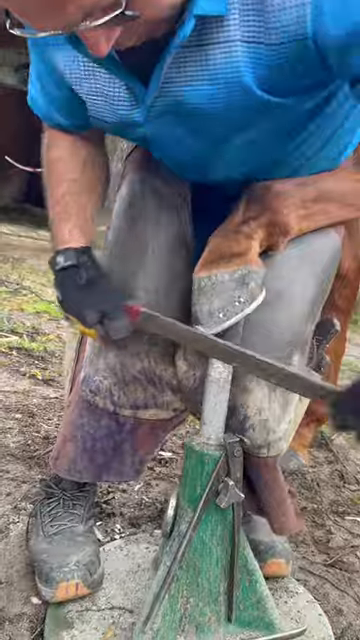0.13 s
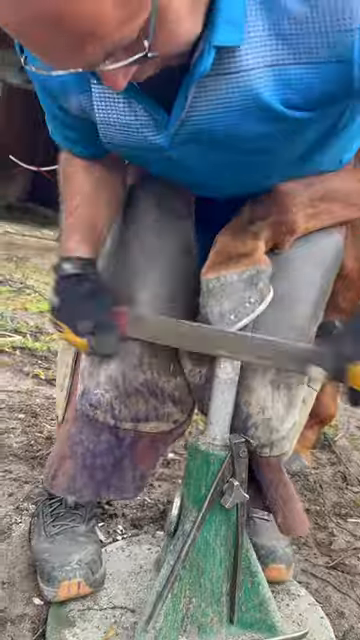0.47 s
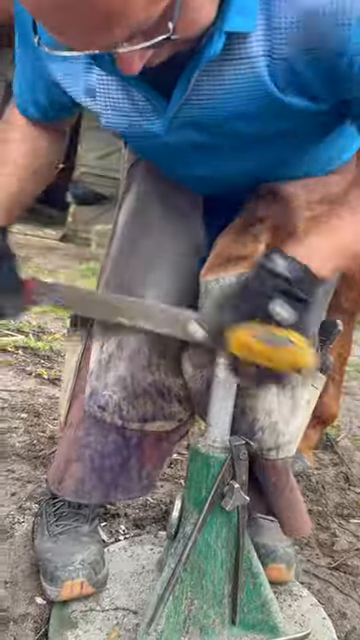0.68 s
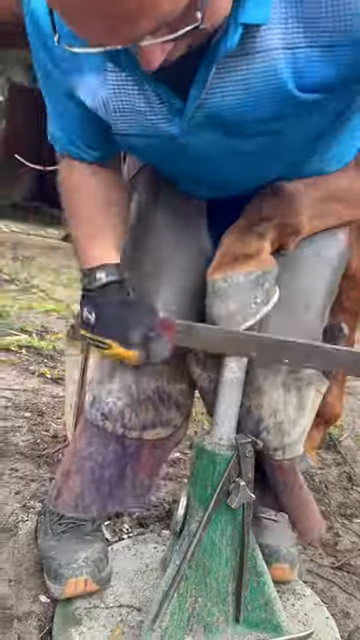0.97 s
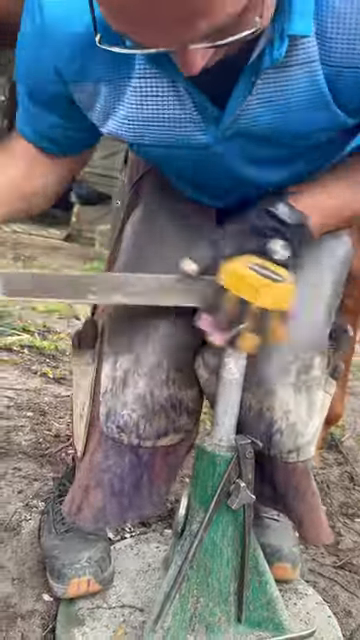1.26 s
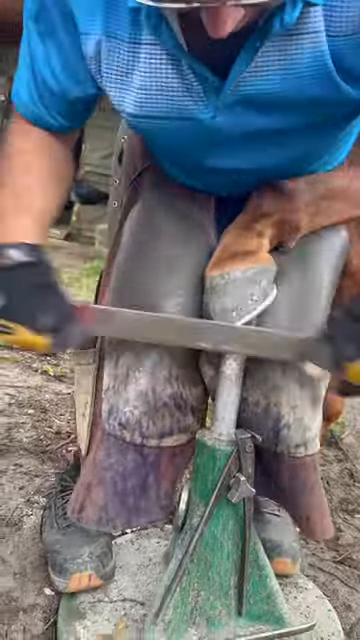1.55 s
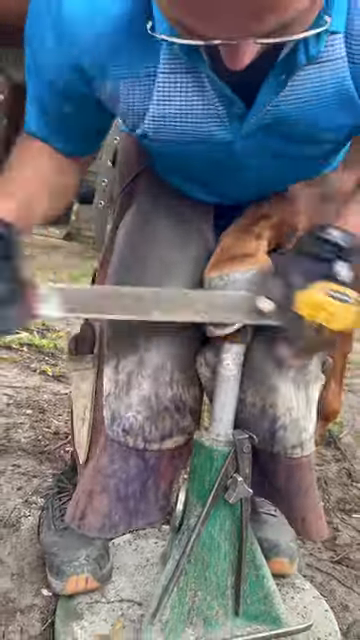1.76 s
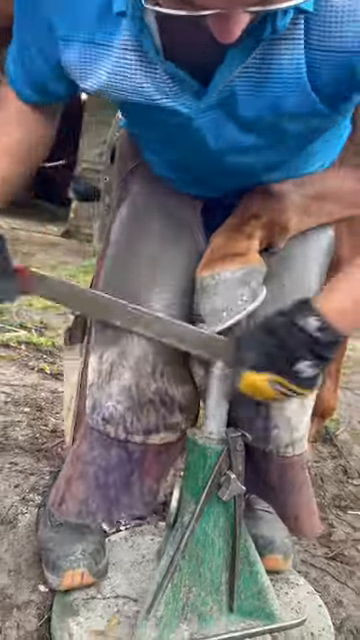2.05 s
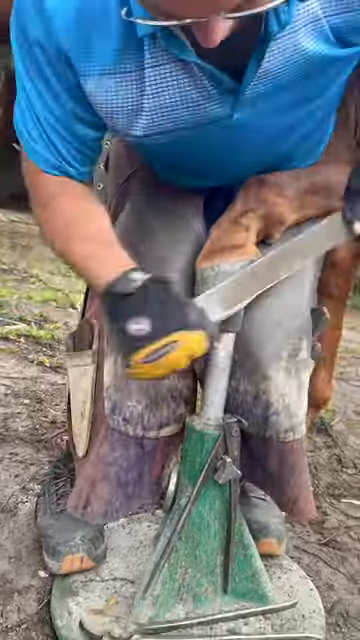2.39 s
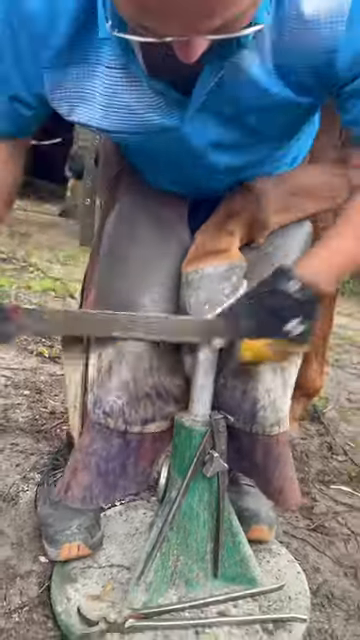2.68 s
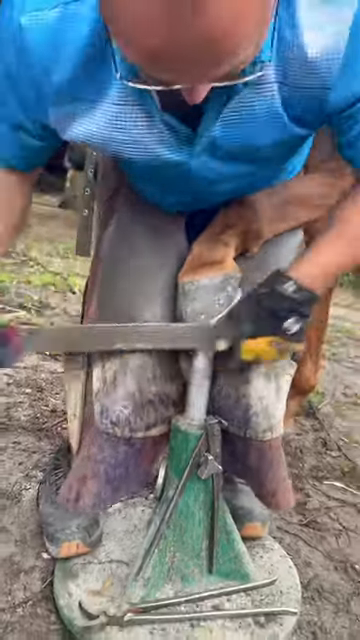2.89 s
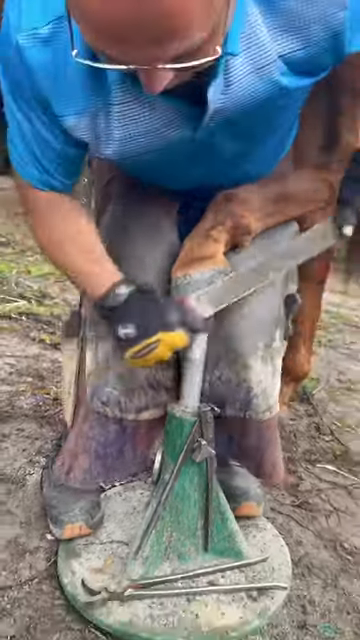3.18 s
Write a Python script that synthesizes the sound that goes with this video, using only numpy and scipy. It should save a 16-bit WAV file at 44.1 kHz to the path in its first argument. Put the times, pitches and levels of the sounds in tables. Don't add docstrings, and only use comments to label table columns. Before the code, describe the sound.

A metal rasp files a horse's hoof on a stand, coarse crackling forward strokes alternating with short bright back skids, first brisk, then slower and duller; close phone microphone outdoors, quiet yard rumble beneath.

```python
import sys
import numpy as np
from scipy import signal
from scipy.fft import rfft, irfft, next_fast_len
from scipy.io import wavfile
from scipy.ndimage import uniform_filter1d

SR = 44100
rng = np.random.default_rng(int(sys.argv[2]) if len(sys.argv) > 2 else 0)


def boost(x):
    u = np.asarray(x, float) / 20
    return 10 ** u


def dump_mix(stems):
    frames = np.atleast_2d(stems).T
    limited = np.clip(frames, -1, 1)
    pcm = np.round(limited * 32767).astype(np.int16)
    wavfile.write(sys.argv[1], SR, pcm)


N = 146853


def evened(x):
    return x / np.sqrt(np.mean(x ** 2) + 1e-20)


def read(points, hz):
    f, value = np.transpose(points)
    return np.interp(np.log(hz + 1), np.log(f + 1), value)


def colour(x, gain):
    size = next_fast_len(N + 4096)
    spectrum = rfft(x, size) * gain(np.fft.rfftfreq(size, 1 / SR))
    return irfft(spectrum, size)[..., :N]


def resonate(x, hz, width):
    turn = np.exp(2j * np.pi * np.cumsum(hz * np.ones(len(x))) / SR)
    r = np.exp(-np.pi * width / SR)
    return 2 * (turn * signal.lfilter([1 - r], [1, -r], x / turn + 1e-18)).real


def wander(span_s):
    size = max(round(span_s * SR), 2)
    smooth = uniform_filter1d(rng.standard_normal(N), size)
    return evened(uniform_filter1d(smooth, size))


def shape(start, length, rise, stop):
    t = np.arange(N) / SR - start
    env = np.clip(t / rise, 0, 1) * np.exp(-np.maximum(t - length, 0) / stop)
    return env, np.clip(t / length, 0, 1)


def chips():
    ticks_per_s, spread_db, lump_db = 16000, 1.1, 1.3
    ticks = (rng.random(N) < ticks_per_s / SR) * rng.standard_normal(N)
    size_db = spread_db * np.minimum(rng.exponential(1, N), 4)
    return evened(ticks * boost(size_db + lump_db * wander(0.002)))


def patchy(x, tilt_db):
    patch_db = 3.4
    hz, t, z = signal.stft(x, SR, nperseg=256, noverlap=192)
    blobs = uniform_filter1d(rng.standard_normal(z.shape), size=2, axis=0)
    blobs = evened(uniform_filter1d(blobs, size=14, axis=1))
    octaves = np.log2(np.clip(hz, 300, 9000) / 3000)[:, None]
    tilt = np.interp(t, np.arange(N) / SR, tilt_db) * octaves
    return signal.istft(z * boost(patch_db * blobs + tilt), SR, nperseg=256, noverlap=192)[1][:N]


# (frequency [Hz], width [Hz], level [dB])
BAR_MODES = [(1000, 38, -6), (1296, 90, 0), (1697, 310, -4), (2260, 81, -8), (2887, 180, -10),
             (3570, 54, -8), (4140, 186, -8.5), (4770, 110, -14), (5936, 81, 4), (6340, 230, 1),
             (6980, 480, 2), (7970, 20, 5.5)]
# (frequency [Hz], width [Hz], level [dB])
TOP_MODES = [(13030, 60, 0), (13840, 60, 1)]


def bar(force, tone, tilt_db):
    ring_db, waver_db = 6, 4
    sound = force.copy()
    for hz, width, db in BAR_MODES + TOP_MODES:
        drive = force * boost(waver_db * wander(0.0092))
        sound += boost(db + ring_db) * resonate(drive, hz, width)
    return colour(patchy(sound, tilt_db), lambda hz: boost(read(tone, hz)))


# (time [s], pressure [dB], tilt [dB per octave])
BRISK_PUSHES = [
    [(0.0, -26.5, -1.5), (0.025, -37.5, -5), (0.052, -49.5, 1), (0.088, -44.5, 0.2), (0.11, -64, 4)],
    [(.32, -43.5, 0.5), (.332, -34.5, 5), (.4, -28.5, 0.5), (.43, -24, -1.5), (.465, -32, -3.5),
     (.51, -48, -5.5), (.542, -38, -2), (.576, -45.5, -5)],
    [(.77, -47, 1.5), (.784, -35.5, 5), (.79, -29.5, 2), (.832, -21.5, -1.2), (.862, -29, 0.5),
     (.886, -24.5, -3.5), (.93, -40.5, 0), (.96, -58.5, 0)],
    [(1.22, -55, -2), (1.235, -35, 1.5), (1.266, -30, 4), (1.294, -31.5, 2.7), (1.328, -23.5, -3),
     (1.37, -35, -3.5), (1.41, -57, -0.5)],
]
# (time [s], pressure [dB], tilt [dB per octave])
SLOW_PUSHES = [
    [(2.14, -62.5, 2.5), (2.158, -36.5, -4.5), (2.29, -31, -2.5), (2.34, -32.5, -2), (2.38, -35, -2),
     (2.395, -43.5, -2.5), (2.43, -62, 0)],
    [(2.77, -65, -1.5), (2.781, -39.5, -6.5), (2.858, -39.5, -3.5), (2.885, -34.5, -3.5),
     (3.04, -37.5, -1.5), (3.08, -61, -5)],
]
# (time [s], pressure [dB], tilt [dB per octave])
BROKEN_PUSHES = [
    [(1.672, -56, 4), (1.688, -30, -2), (1.725, -22, 0.5), (1.742, -33.5, -4.5), (1.748, -26, 12),
     (1.765, -26.5, -3.5), (1.82, -35.5, -3.5), (1.85, -47.5, -2)],
    [(2.45, -45, -2.5), (2.51, -34, -2), (2.55, -26, -4.5), (2.588, -30.5, -2), (2.598, -39, -2.5),
     (2.62, -31, -4), (2.7, -42, -7.5), (2.73, -58.5, -11.5)],
]
# (frequency [Hz], level [dB])
HORN_COLOUR = [(380, -3), (560, 5.5), (1500, -0.5), (3000, 7), (5000, 3), (7000, -4.5), (10000, -3),
               (16000, 1.5)]


def pushes():
    t, press, tilt_db = np.arange(N) / SR, np.zeros(N), np.zeros(N)
    for stroke in BRISK_PUSHES + SLOW_PUSHES + BROKEN_PUSHES:
        s, db, tilt = np.transpose(stroke)
        inside = (t >= s[0]) & (t <= s[-1])
        press[inside] = boost(np.interp(t[inside], s, db))
        tilt_db[inside] = np.interp(t[inside], s, tilt)
    return boost(-4.5) * bar(chips() * uniform_filter1d(press, size=100), HORN_COLOUR, tilt_db)


# (time [s], length [s], level [dB], pitch [Hz])
STAND_JOLTS = [(0, 0.044, -25, 203), (0.057, 0.022, -23.5, 132), (0.155, 0.067, -35.5, 196),
               (0.343, 0.059, -31.5, 137), (0.523, 0.019, -29.5, 284), (0.482, 0.063, -28, 184),
               (0.797, 0.019, -22, 166), (0.908, 0.028, -28, 197), (1.23, 0.028, -35, 132),
               (1.36, 0.023, -21, 120.4), (1.69, 0.029, -28, 143), (1.798, 0.07, -35, 195),
               (2.157, 0.032, -28.5, 144), (2.235, 0.11, -37, 101), (2.345, 0.054, -29.5, 191),
               (2.19, 0.033, -38, 110), (2.8, 0.032, -30, 131), (2.96, 0.115, -29.5, 139.5)]


def jolts():
    ring_s, width, grit_db = 0.013, 0.44, -7
    out = np.zeros(N + SR)
    shakes = rng.standard_normal((len(STAND_JOLTS), SR // 3))
    for (start, length, db, hz), shake in zip(STAND_JOLTS, shakes):
        low = evened(resonate(resonate(shake, hz, width * hz), hz, hz))
        grit = evened(resonate(resonate(shake, 1.7 * hz, 1.4 * hz), 3.5 * hz, 5.3 * hz))
        sound = (low + boost(grit_db) * grit)[SR // 12:]
        env = shape(0, length, 0.0015, ring_s)[0][:len(sound)]
        out[round(start * SR):][:len(sound)] += boost(db) * env * sound
    return out[:N]


# (frequency [Hz], level [dB per Hz])
YARD_COLOUR = [(28, -23), (50, -3), (100, 1), (390, -14.5), (550, -18), (1300, -22), (9000, -40.5),
               (20000, -40)]


def yard():
    level_db, top_db_per_oct = -35, -5.5
    top = YARD_COLOUR[-2][0]

    def gain(hz):
        slope = top_db_per_oct * np.log2(np.maximum(hz / top, 1))
        return boost(read(YARD_COLOUR[:-1], hz) + slope)

    wash = colour(rng.standard_normal((2, N)), gain)
    return boost(level_db + 0.5 * wander(0.43)) * evened(wash)


# (time [s], frequency [Hz], level [dB], T60 [s])
TAPS = [
    (.075, 261.7, -22, 0.33),
    (1.43, 1000, -19, 0.031),
    (1.43, 1343, -19, 0.027),
    (1.43, 690, -23.5, 0.039),
    (1.429, 2940, -27.5, 0.03),
    (3.04, 1393, -22, 0.034),
]


def knocks():
    out, t = np.zeros(N), np.arange(N) / SR
    for s, hz, db, t60 in TAPS:
        u = np.maximum(t - s, 0)
        out += boost(db - 60 * u / t60) * np.minimum(u / 0.0043, 1) * np.sin(2 * np.pi * hz * u)
    return out


# (time [s], length [s], level [dB], sag [dB])
BACK_DRAGS = [
    (0.14, 0.053, -24, -7),
    (0.578, 0.073, -21.5, -11.5),
    (0.979, 0.019, -40, -3.5),
    (1.05, 0.047, -23.5, -11),
    (1.425, 0.018, -33, -29.5),
    (1.523, 0.025, -23.5, -4.5),
    (3.042, 0.007, -35.5, -2.5),
    (3.143, 0.024, -40, -9),
    (1.96, 0.074, -50, 1.5),
]
DRAG_RISES = [0.00092, 0.018, 0.0026, 0.00034, 0.008, 0.00058, .003, 0.0026, .02]
# (frequency [Hz], level [dB])
SKID_COLOUR = [(300, -0.5), (700, 9.5), (1500, 3), (3000, 9), (5000, 2), (7000, -5), (10000, -8.5),
               (16000, 0.5)]


def drags():
    stop_s, after_db, after_s = 0.0039, -14, 0.052
    land_db, land_s = 3, 0.004
    level = np.zeros(N)
    for (start, length, db, sag_db), rise in zip(BACK_DRAGS, DRAG_RISES):
        env, gone = shape(start, length, rise, stop_s)
        skid = env * boost(land_db * np.exp(-gone * length / land_s))
        brush = boost(after_db) * shape(start, length, rise, after_s)[0]
        level += boost(db + sag_db * gone) * (skid + brush)
    return boost(-5) * bar(chips() * level, SKID_COLOUR, np.zeros(N))


# (time [s], peak level [dB], frequency [Hz])
TORN_CHIPS = [(0.1401, -14, 3260), (0.1523, -10.5, 1190), (0.162, -15.5, 2320), (0.415, -12.5, 1697),
              (0.4234, -13.5, 990), (0.5248, -27.5, 1090), (0.5925, -15, 2850), (0.7093, -28, 1120),
              (0.789, -16.5, 5620), (0.8215, -12.5, 4230), (0.877, -13, 1512), (1.053, -12.5, 2736),
              (1.1253, -29.5, 1030), (1.235, -26, 5930), (1.3296, -17, 1750), (1.7024, -13.5, 1500),
              (2.158, -22.5, 1160), (2.1853, -22, 1090), (2.2762, -12, 1390), (2.3392, -18.5, 1500),
              (2.4384, -27, 1350), (2.619, -23, 1280), (2.6723, -20.5, 1370), (2.7801, -24, 1290),
              (2.803, -18.5, 1180), (2.8867, -14.5, 1294), (2.9893, -18.5, 1360), (3.045, -17.5, 1313),
              (3.1492, -27, 6130)]


def bites():
    level_db, ring_t60, crack_db, crack_t60 = -6, 0.04, -6, 0.012
    t, out = np.arange(SR // 16) / SR, np.zeros(N + SR)
    cracks = rng.standard_normal((len(TORN_CHIPS), len(t)))
    for (s, db, hz), crack in zip(TORN_CHIPS, cracks):
        ring = boost(-60 * t / ring_t60) * np.sin(2 * np.pi * hz * t)
        snap = boost(crack_db - 60 * t / crack_t60) * crack
        out[round(s * SR):][:len(t)] += boost(db + level_db) * np.minimum(t / 0.00077, 1) * (ring + snap)
    return colour(out[:N], lambda hz: 1 / (1 + (hz / 9000) ** 2 + (700 / (hz + 1)) ** 2))


# (time [s], length [s], level [dB], first pitch [Hz], last pitch [Hz])
TOOTH_HUMS = [(.428, 0.026, -28, 1120, 880), (.405, 0.074, -27.5, 522.6, 266), (.522, .035, -45, 380, 300),
              (.582, 0.034, -37, 1265, 1460), (.585, 0.029, -32, 3050, 2950), (.6, 0.045, -32, 2150, 2313),
              (.795, 0.017, -32, 1780, 1710), (.878, 0.02, -34, 3030, 3170), (.975, 0.024, -42, 2980, 2970),
              (1.055, 0.027, -31, 1600, 1533), (1.31, .035, -42, 1785, 1800), (.822, 0.027, -25, 647, 524),
              (1.266, 0.029, -26, 620, 507), (1.308, 0.02, -31, 520, 440), (1.345, 0.027, -30.5, 600, 533),
              (1.68, 0.075, -23.5, 620, 496), (1.75, 0.03, -25.5, 1492, 1412),
              (1.79, 0.038, -29.5, 598.6, 527), (2.156, 0.09, -33, 500.6, 559),
              (2.245, 0.1056, -29.5, 680, 608), (2.23, 0.082, -32.5, 1236, 1410),
              (2.325, .045, -36, 1484, 1390), (2.51, 0.053, -30, 538, 674),
              (2.51, 0.074, -35.5, 2210, 2250), (2.52, 0.071, -31.5, 2735, 2880),
              (2.62, 0.046, -34, 600, 673), (2.83, 0.11, -32, 500, 680), (2.883, 0.083, -36.5, 1280, 1408),
              (3.01, 0.024, -38.5, 1380, 1370)]


def hums():
    edge, arch, waver_hz, lump_db = 0.17, 0.8, 34, 3
    out, waver, lump = np.zeros(N), wander(0.002952), wander(0.0034)
    for k, (start, length, db, first_hz, last_hz) in enumerate(TOOTH_HUMS):
        later = k * SR // 9
        env, gone = shape(start, length, edge * length, 0.0049)
        hz = first_hz + (last_hz - first_hz) * gone ** arch + waver_hz * np.roll(waver, later)
        level = boost(db + 0.5 + lump_db * np.roll(lump, later))
        out += level * env * np.sin(2 * np.pi * np.cumsum(hz) / SR)
    return out


def echo(rasp):
    level_db, t60 = -12, 0.069
    t = np.arange(SR // 4) / SR
    tail = evened(rng.standard_normal(len(t)) * boost(-60 * t / t60)) / np.sqrt(len(t))
    return boost(level_db) * signal.fftconvolve(rasp, tail)[:N]


def scramble(x):
    z = signal.stft(x, SR, nperseg=256, noverlap=192)[2]
    drift = uniform_filter1d(rng.standard_normal((2,) + z.shape), size=3, axis=1)
    a, b = uniform_filter1d(drift, size=40, axis=2)
    turned = z * np.exp(1j * np.arctan2(a, b))
    return 1.15 * signal.istft(turned, SR, nperseg=256, noverlap=192)[1][:N]


# (frequency [Hz], level [dB])
PORT_DIFFERENCE = [(60, -39), (200, -27), (350, -17), (900, -13), (1900, -19), (3000, -9), (6000, -4),
                   (9000, 2)]


def ports(near, air):
    lean_hz, lean_share, lean_oct = 600, 0.24, 0.65
    lean = colour(near, lambda hz: lean_share * np.exp(-(np.log2((hz + 1) / lean_hz) / lean_oct) ** 2))
    side = lean + colour(scramble(near) + air[1], lambda hz: boost(read(PORT_DIFFERENCE, hz)))
    return np.array([near + air[0] + side, near + air[0] - side])


def scene():
    rasp = pushes() + hums() + drags() + knocks() + bites()
    near = rasp + echo(rasp) + jolts()
    return ports(near, yard())


# (frequency [Hz], rarity of kept patches [rms])
MID_PATCHES = [(10500, 4), (12400, 4), (13200, 1.4), (14500, 1.7), (15500, .7)]


def thin_mid(mid):
    edge_hz, kept_db = 9950, -1
    hz, t, z = signal.stft(mid, SR, nperseg=1024, noverlap=512)
    field = uniform_filter1d(rng.standard_normal((65, len(t))), size=3, axis=1)
    field = field.repeat(8, axis=0)[:len(hz)]
    below = hz[:, None] < edge_hz + 300 * np.round(field[0] * 2)
    patches = evened(field) > read(MID_PATCHES, hz)[:, None]
    keep = np.where(below, 1, boost(kept_db) * patches)
    return signal.istft(z * keep, SR, nperseg=1024, noverlap=512)[1][:N]


# (frequency [Hz], rarity of dropped patches [rms])
SIDE_HOLES = [(6000, 2.4), (9000, 2.6), (11000, 2.2), (13000, 1.3), (14500, 1.0), (15500, 1.3)]


def thin_side(side):
    hz, t, z = signal.stft(side, SR, nperseg=1024, noverlap=512)
    field = evened(uniform_filter1d(rng.standard_normal((65, len(t))), size=4, axis=1))
    field = field.repeat(8, axis=0)[:len(hz)]
    z = z * (field < read(SIDE_HOLES, hz)[:, None])
    return signal.istft(z, SR, nperseg=1024, noverlap=512)[1][:N]


def roll_off(x):
    return signal.sosfilt(signal.butter(12, 15940, fs=SR, output="sos"), x)


def record(dry):
    ceiling = 0.5
    left, right = ceiling * np.tanh(dry / ceiling)
    mid, side = thin_mid((left + right) / 2), thin_side((left - right) / 2)
    both = np.array([mid + side, mid - side])
    mix = colour(both, lambda hz: (hz < 15950) / (1 + (33 / (hz + 1)) ** 4))
    return roll_off(mix)


dry = scene()
out = record(dry)
dump_mix(out)
```